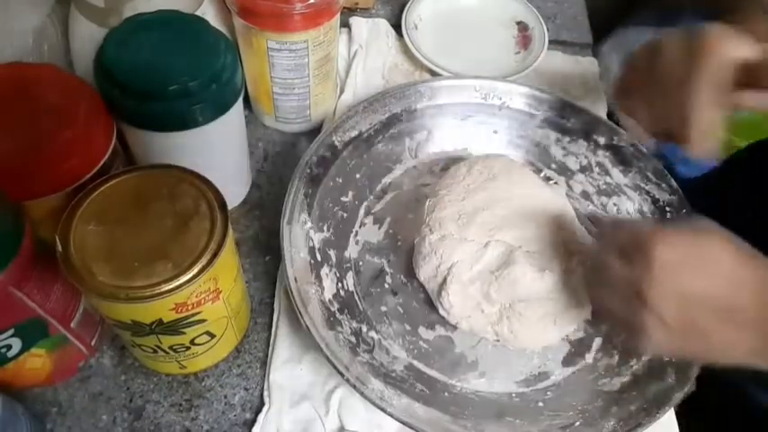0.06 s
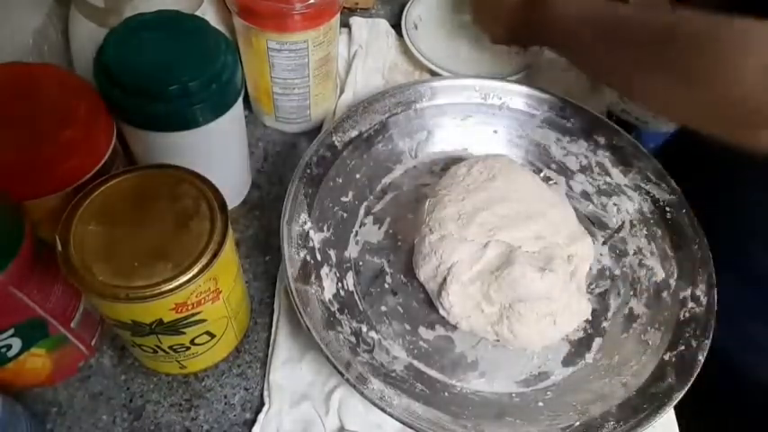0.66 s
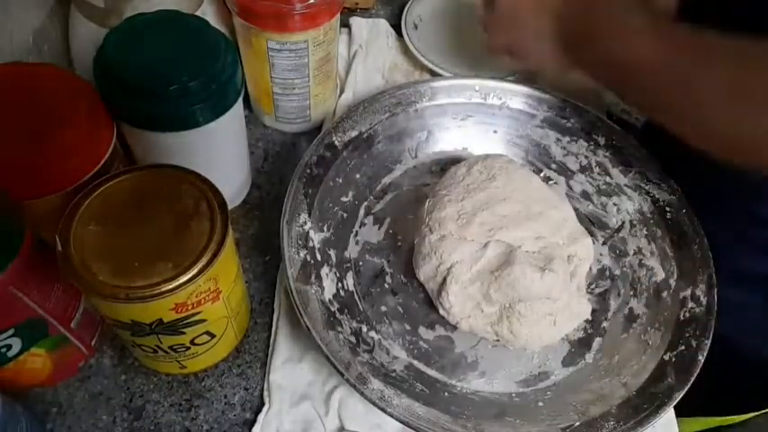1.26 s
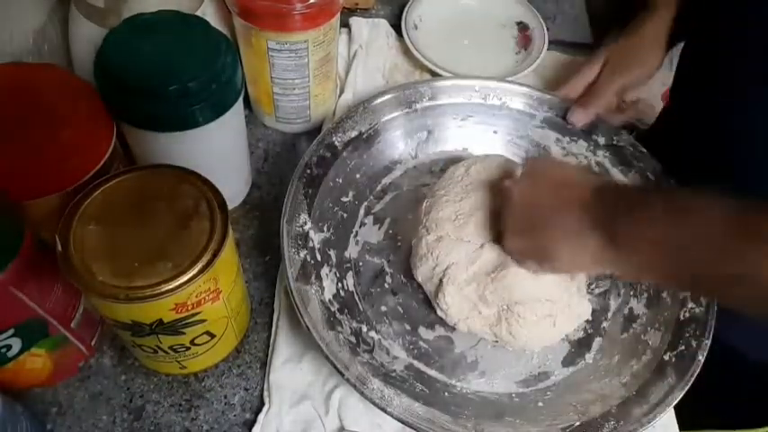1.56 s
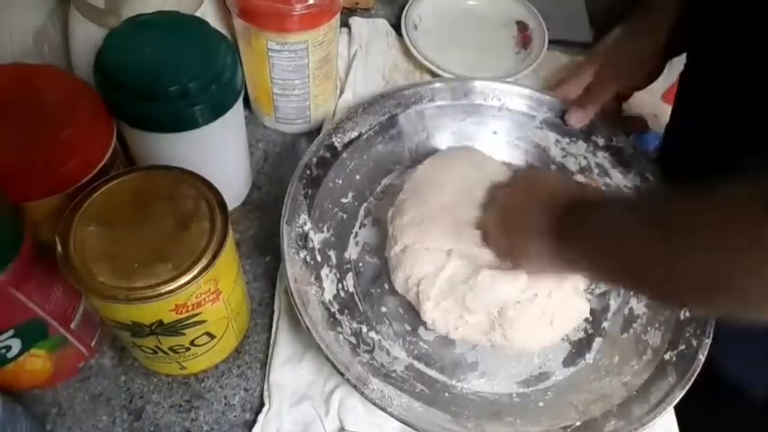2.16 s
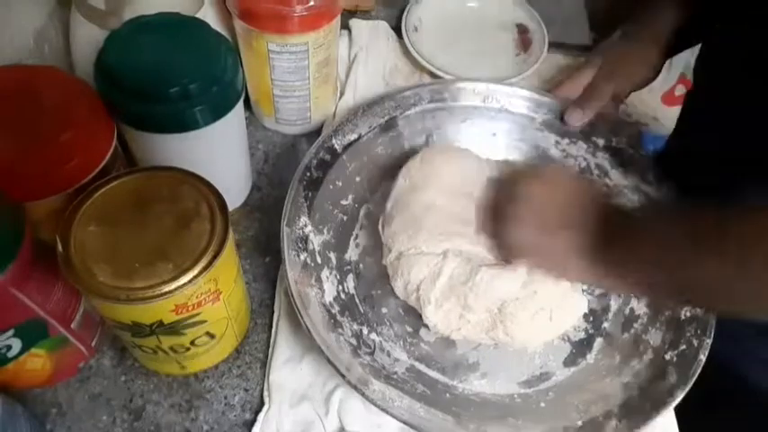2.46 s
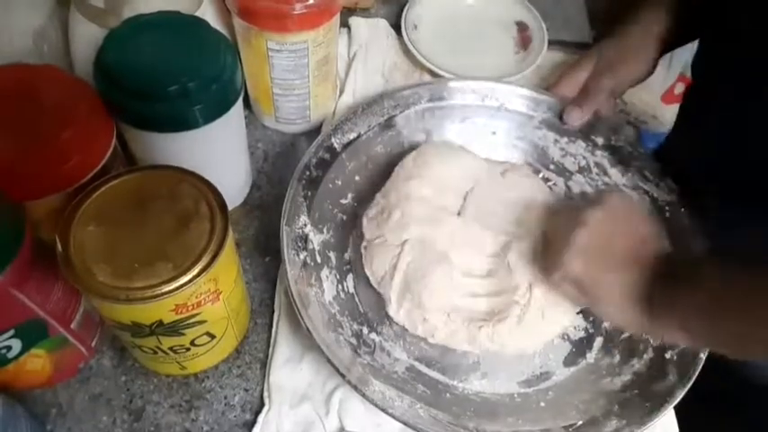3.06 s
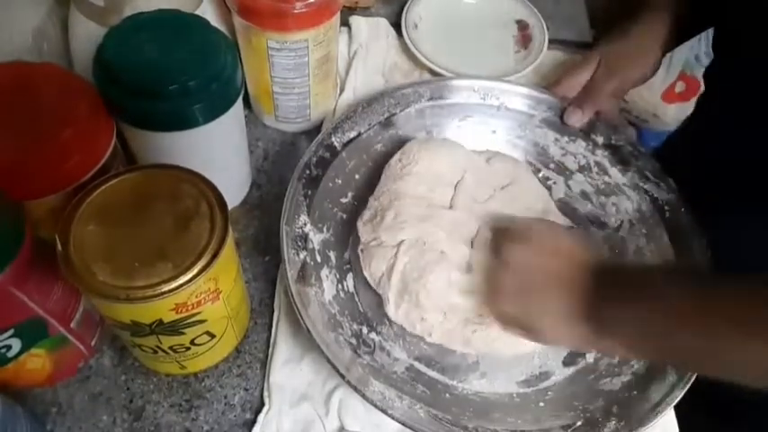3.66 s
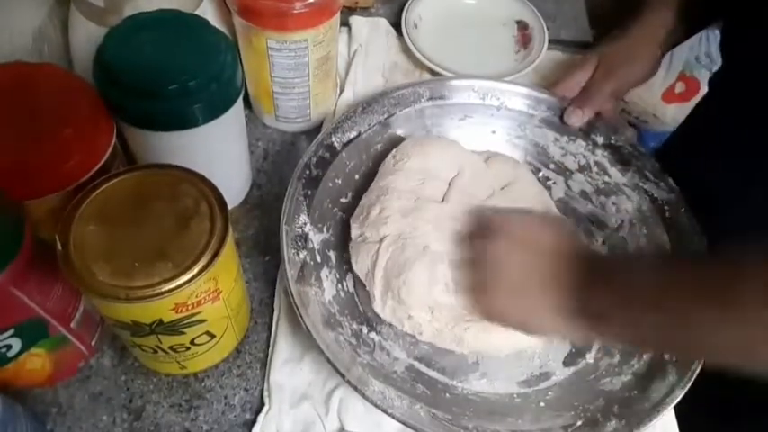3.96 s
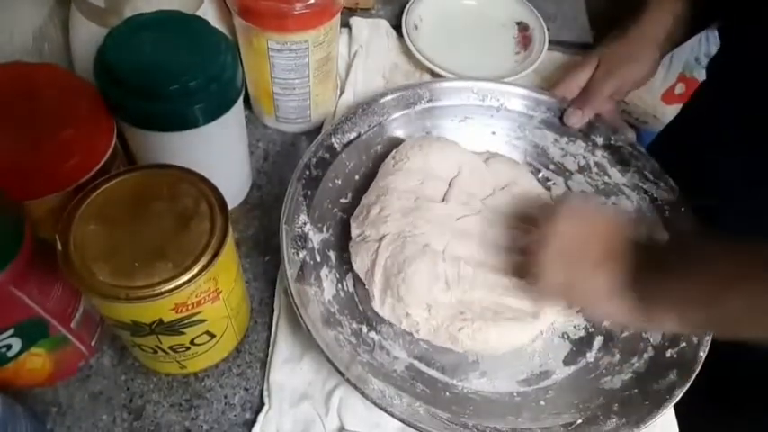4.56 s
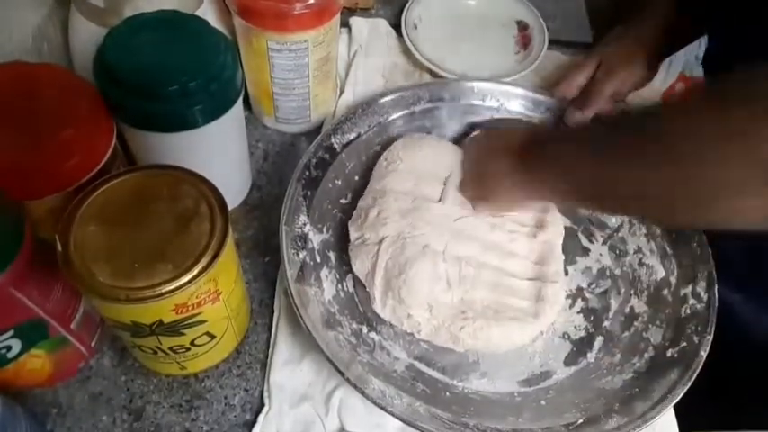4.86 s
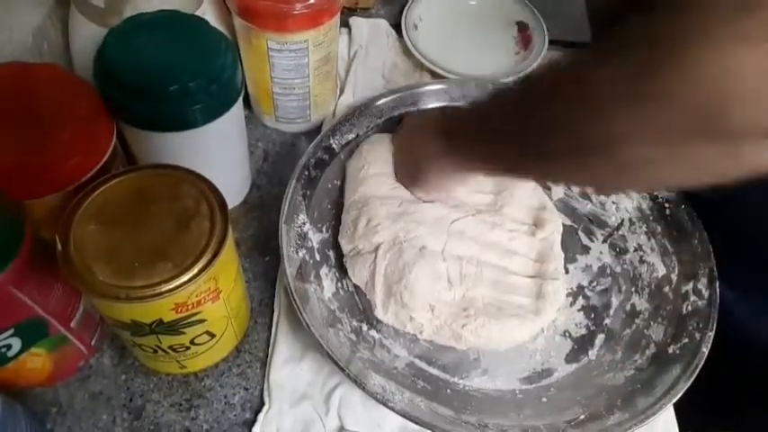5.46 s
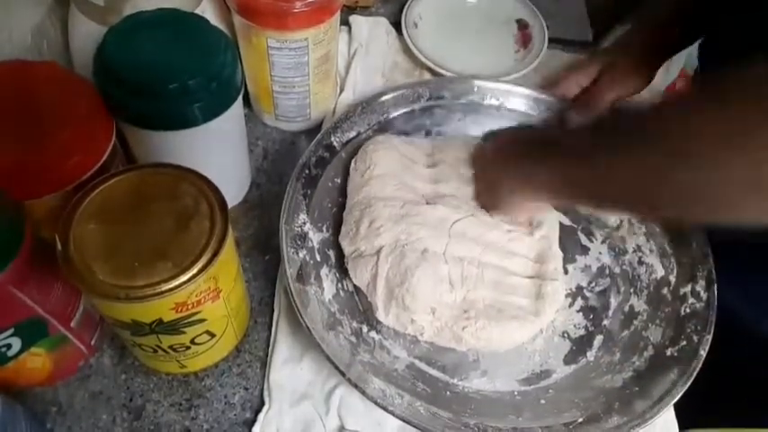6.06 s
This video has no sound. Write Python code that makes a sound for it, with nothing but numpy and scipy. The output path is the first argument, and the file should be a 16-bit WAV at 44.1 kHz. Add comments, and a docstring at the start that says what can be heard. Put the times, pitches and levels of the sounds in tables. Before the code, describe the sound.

A fist kneads dough in a steel tray, with soft thuds, squelches and sticky ticks over a low hum.

```python
"""A low hum of motors fills a small kitchen. Then a hand rubs and folds dough in a floured steel tray:
the flour hisses, tacky skin ticks, the dough pops and sticky spots peel off in short rasps.
A fist pushes in again and again. Each push hisses as skin meets dough, squeezes air out and
thuds the damped tray on the counter. Partway through, the tray rocks and clacks once."""
import sys
import numpy as np
from scipy import signal
from scipy.fft import rfft, irfft, next_fast_len
from scipy.io import wavfile
from scipy.ndimage import uniform_filter1d

SR = 44100
rng = np.random.default_rng(int(sys.argv[2]) if len(sys.argv) > 2 else 0)


def materialize(psi):
    """Save the field psi as 16-bit PCM at rate SR to the path in sys.argv[1].

    A 1-D psi becomes a single channel; in a 2-D psi each row is a channel.
    """
    bounded = np.clip(np.atleast_2d(psi).T, -1, 1)
    quanta = np.round(bounded * 32767).astype(np.int16)
    wavfile.write(sys.argv[1], SR, quanta)


N = 279141
TIME, FFT_SIZE = np.arange(N) / SR, next_fast_len(N, real=True)

# Two kitchen motors. Each row: time in seconds, level of the lower one in dB, of the higher one in dB.
MOTOR_LEVELS = [(0, -54.5, -46.5), (.6, -50, -48.5), (2.1, -46.5, -48), (2.8, -50, -55),
                (4.7, -47.5, -60.5), (5.45, -60.5, -54.5), (6.33, -44.5, -48.5)]
# Tone colours of six noises. Each row: frequency in Hz, relative strength there in dB.
RUMBLE_COLOUR = [(20, -40), (35, -18), (52, 2), (80, -1), (100, 0.5), (122, -4), (150, -6.5), (200, -9.5),
                 (245, -19), (290, -12), (360, -23.5), (500, -30), (800, -35.5), (1400, -41.5),
                 (2200, -40.5), (2900, -45), (6000, -49.5), (8300, -45.5), (10000, -49.5), (15500, -47.5)]  # the room's air
FLOUR_COLOUR = [(700, -12.5), (2200, -5), (6000, -2.5), (16000, 1)]  # floury skin sliding
DRAG_COLOUR = [(150, -20), (450, -6), (900, 4), (1300, -23), (2100, -16.5), (3200, -7), (6000, 5),
               (16000, -62)]  # dough dragging on steel
SKIN_COLOUR = [(500, -11), (1700, -13.5), (4500, -4.5), (9500, -6.5), (13000, -2), (16000, -7.5)]  # the fist meeting dough
SQUELCH_COLOUR = [(120, -14.5), (350, 7), (520, 0), (700, -6), (950, -7.5), (1250, -4), (1600, -4),
                  (2500, 2), (4000, -2.5), (8000, -7.5), (16000, -52)]  # dough being squeezed
PUFF_COLOUR = [(60, -12), (170, -1.5), (270, 0.5), (420, -6.5), (650, -13), (1200, -30), (3000, -67)]  # its soft bulk giving way
# Strokes of the hand. Each row: start, swell time and easing time in seconds, flour hiss in dB,
# dough drag in dB.
HAND_STROKES = [(.832, 0.029, 0.061, -63.5, -77), (1.23, 0.13, 0.077, -63.5, -83),
                (1.548, 0.0028, 0.12, -65.5, -80), (1.659, 0.07, 0.58, -59.5, -73),
                (2.188, .14, 0.21, -53.5, -71), (2.601, 0.015, 0.13, -60, -68),
                (2.739, 0.13, .15, -53.5, -70), (3.19, 0.15, 0.25, -54.5, -68.5),
                (3.695, 0.1, 0.42, -60.5, -74), (4.23, .03, .04, -64, -77),
                (4.299, 0.0045, 0.071, -62.5, -89), (4.367, 0.028, .1, -50.5, -57.5),
                (4.862, 0.057, .04, -64.5, -75), (4.953, 0.051, 0.25, -52, -71),
                (5.384, 0.004, 0.05, -63.5, -87), (5.453, .005, 0.066, -60.5, -67),
                (5.63, 0.0031, 0.2, -59, -81), (6.004, 0.1, 0.087, -58.5, -70),
                (6.115, 0.095, 0.2, -50.5, -63.5)]
# The tray's rim, damped by the holding hand. Each row: pitch in Hz, level in dB, seconds to fade 60 dB.
RIM_TONES = [(494, -3.5, 0.043), (865, -15, 0.047), (1070, -20, 0.23), (1206, -35, 0.27),
             (1634, -4.5, 0.046), (1890, -6, 0.023), (2676, -1.5, 0.082), (3889, -6, 0.147)]
# The kitchen's echo. Each row: frequency in Hz, seconds to fade 60 dB.
ECHO_TIMES = [(100, 0.46), (500, 0.31), (1500, 0.17), (4000, 0.15), (12000, 0.15)]
# Short pops of the dough and sharp, sticky ticks of the hand touching it. Each row: start in seconds,
# level in dB, pitch in Hz, width as a share of the pitch (wider dies sooner), relative crack level in dB.
POPS_AND_TICKS = [(1.2315, -42, 7300, .08, -21), (1.989, -41.5, 11000, 1, 10),
                  (2.0106, -15.5, 1830, 0.19, -8), (2.0165, -21, 2400, .3, -8),
                  (2.041, -20, 3940, 0.13, -4.5), (2.287, -41, 8000, 0.18, -5),
                  (2.393, -39, 9000, 0.47, -3), (2.4935, -23, 4900, .18, -26),
                  (2.496, -13, 10850, 0.14, -4.5), (2.9375, -42.5, 8260, .22, 6.5),
                  (2.959, -38.5, 6000, .31, -15), (3.0245, -19.5, 6000, 0.56, 0.5),
                  (3.495, -21, 4770, .13, 2), (3.999, -44, 11900, 0.15, -25.5),
                  (4.0155, -23, 3880, 0.46, -4.5), (4.184, -40.5, 226, 0.143, -57),
                  (4.9517, -26.5, 8250, .2, -10), (5.0569, -23.5, 3340, 0.72, -27),
                  (5.1432, -28.5, 8150, .72, 2), (5.4525, -36.5, 8640, 0.17, -1),
                  (5.5246, -31.5, 5140, 0.33, -16), (6.112, -23.5, 10900, .16, -3.5)]
# Sticky skin peeling off. Each row: start and fade time in seconds, level in dB, pitch and width in Hz.
SKIN_PEELS = [(1.63, 0.075, -74, 1540, 300), (1.712, .079, -58.5, 6140, 2500),
              (1.718, .05, -69, 2440, 1400), (1.753, 0.036, -61.5, 3120, 1800),
              (1.989, 0.032, -48, 1500, 1303), (2.286, .053, -56.5, 7900, 900),
              (2.326, 0.049, -59, 2110, 1210), (2.388, .04, -56.5, 10100, 7000),
              (4.155, 0.057, -61.5, 1580, 152), (4.16, .055, -55.5, 3380, 1400),
              (4.798, 0.064, -70.5, 2370, 900), (5.045, .025, -47.5, 2580, 700),
              (5.067, 0.051, -49.5, 1930, 200), (5.562, .016, -49, 6120, 4970)]
# Pushes of the fist. Each row: start, swell time and fade time in seconds, skin hiss in dB, squelch
# in dB, pitch of the escaping air in Hz, its level in dB, rasp of the hollow under the fist in dB,
# thud in dB, tilt of the thud in dB per octave (higher is brighter).
FIST_PUSHES = [(1.986, 0.02, 0.045, -36, -38, 1910, -43, -67, -31, 3),
               (2.493, 0.0058, 0.069, -40.5, -39.5, 2070, -42.5, -55, -28, 0.5),
               (2.992, 0.039, .031, -37, -40.5, 1940, -40, -49.5, -38.5, 1),
               (3.482, .018, 0.083, -41, -45, 2270, -41, -54.5, -36, 5.5),
               (4, .017, 0.065, -37.5, -47, 3430, -51.5, -50.5, -40, 2.5),
               (4.15, 0.0097, 0.064, -51, -60.5, 1700, -64, -69, -43, -4),
               (4.525, 0.058, 0.059, -41, -58, 1280, -57, -55.5, -47.5, 3),
               (5.045, 0.026, 0.072, -72, -49, 2070, -53, -62, -41.5, -8),
               (5.131, 0.0415, .073, -37, -42, 1640, -48, -55, -37, -2),
               (5.505, 0.02, 0.1, -51, -64, 1970, -60.5, -69, -62, 0),
               (5.704, 0.061, 0.057, -37.5, -47, 1900, -51.5, -55.5, -37, -0.5),
               (6.153, 0.0078, 0.032, -42.5, -63, 2150, -59, -66, -64, -10),
               (6.286, 0.019, 0.033, -35.5, -42, 2300, -63, -61, -32.5, -9)]
# The loaded tray on its cloth. Each row: pitch in Hz, relative level in dB, seconds to fade 60 dB.
TRAY_TONES = [(61, 9, 0.099), (96, 4.5, 0.32), (122.7, 5.5, 0.24), (186, -2, 0.254), (222, -6.5, 0.44),
              (269.8, -9, 0.043), (287.2, -1.5, 0.2), (333.4, -6.5, 0.03), (375, -8.5, 0.21),
              (468, -10, 0.15), (559, -25.5, 0.47)]
# The two quick hits of the tray's clack on the counter. Each row reads as in POPS_AND_TICKS.
CLACK_HITS = [(4.3814, -16, 1880, 0.24, -6), (4.3848, -22, 1960, 0.41, -12)]


def amp(db):
    """Turns decibels into a number to multiply a sound by."""
    return 10 ** (np.asarray(db) / 20)


def unit(x):
    """Scales a signal so that its average level (rms) is one."""
    return x / np.sqrt(np.mean(x ** 2) + 1e-20)


def look_up(table, hz):
    """Reads a table at any frequency, sliding between its rows on a scale of octaves."""
    row_hz, value = np.transpose(table)
    return np.interp(np.log(hz + 1), np.log(row_hz), value)


def colour(x, table):
    """Gives a noise the tone colour in a table, at a level of one."""
    gain = amp(look_up(table, np.fft.rfftfreq(FFT_SIZE, 1 / SR)))
    return unit(irfft(rfft(x, FFT_SIZE) * gain, FFT_SIZE)[..., :N])


def add(mix, start, sound):
    """Mixes a sound into both channels at a start time in seconds."""
    part = mix[:, max(round(start * SR), 0):][:, :sound.shape[-1]]
    part += sound[..., :part.shape[1]]


def excerpt(noise, start, t):
    """Takes a piece of a long noise, beginning at start and lasting as long as t."""
    return noise[:, (round(start * SR) + np.arange(len(t))) % N]


def drift(per_s):
    """A curve that wanders to a new random value per_s times a second."""
    points = rng.standard_normal(4000)
    return unit(np.interp(TIME * per_s, np.arange(len(points)), points))


def motor_hum():
    """Two motors beat against each other over a weaker mains hum; all three waver slightly."""
    times, lower_db, higher_db = np.transpose(MOTOR_LEVELS)
    lower, higher = np.interp(TIME, times, lower_db), np.interp(TIME, times, higher_db)
    out = np.zeros(N)
    for hz, db in [(58.15, lower), (76.9, higher), (120, -59)]:
        level = np.sqrt(2) * amp(db + 0.2 * drift(2.5))
        out += level * np.sin(2 * np.pi * (hz * TIME + rng.random()) + .02 * drift(13))
    return out


def room_air():
    """A rumble shared by both ears lies under a thin hiss from all around."""
    common, apart = rfft(rng.standard_normal((2, FFT_SIZE)))
    apart_db = [(60, -9), (130, -13.5), (300, -5), (1000, -1), (5000, 1)]  # pairs of Hz and dB
    apart = apart * amp(look_up(apart_db, np.fft.rfftfreq(FFT_SIZE, 1 / SR)))
    return amp(-52.5) * colour(irfft([common + apart, common - apart], FFT_SIZE), RUMBLE_COLOUR)


def friction(per_s, spread_db, smooth, lumpy_db):
    """Rubbing makes countless tiny slips of uneven size, in clumps, over a smooth hiss."""
    hiss = rng.standard_normal(N)
    at = np.flatnonzero(rng.random(N) < per_s / SR)
    slips = np.zeros(N)
    slips[at] = np.sign(hiss[at]) * amp(spread_db * np.minimum(rng.exponential(1, N)[at], 4))
    return (unit(slips) + smooth * hiss) * amp(lumpy_db * drift(220))


def flour_hiss(shared):
    """Fine grains hiss all over the tray; the two ears share only part of the sound."""
    common, left, right = (friction(per_s=1500, spread_db=4.5, smooth=1.1, lumpy_db=3.5)
                           for _ in range(3))
    return colour(np.sqrt(shared) * common + np.sqrt(1 - shared) * np.array([left, right]), FLOUR_COLOUR)


def steel_wall(x, patchy_db, apart=1.0):
    """The hand moves within the tray's curved wall, so the colour at each ear keeps changing."""
    hz, _, spectrum = signal.stft(x, SR, nperseg=256)
    patches = uniform_filter1d(rng.standard_normal((3, *spectrum.shape)), size=3, axis=1)
    level, phase, balance = unit(uniform_filter1d(patches, size=6, axis=2))
    turn = apart * np.minimum(hz / 3500, 1)[:, None] ** 0.5 * phase + np.pi * hz[:, None] / SR * .7
    side = amp(3.6 * balance) * np.exp(-1j * turn)  # what one ear gains, the other loses
    ears = spectrum * amp(patchy_db * level) * np.array([side, 1 / side])
    return unit(signal.istft(ears, SR, nperseg=256)[1][:, :N])


def stroke(t, swell, ease):
    """The loudness of one stroke: the hand grips, speeds up, slows down and lifts off."""
    grip_db = -12.5 * np.clip(1 - t / swell, 0, 1) ** 1.1
    ease_db = -11 * np.maximum(t - swell, 0) / ease
    lift = np.exp(-np.maximum(t - swell - ease, 0) / .015)
    return np.clip(t / 0.0014, 0, 1) * amp(grip_db + ease_db) * lift


def hand_rubs():
    """Floury skin slides over the dough, and the dough drags over the steel."""
    flour = flour_hiss(shared=0.06)
    drag = friction(per_s=270, spread_db=3.5, smooth=2.5, lumpy_db=3.9)
    drag = steel_wall(colour(drag, DRAG_COLOUR), patchy_db=5)
    t, out = np.arange(SR // 2) / SR, np.zeros((2, N))
    for start, swell, ease, flour_db, drag_db in HAND_STROKES:
        rub = amp(flour_db) * excerpt(flour, start, t) + amp(drag_db) * excerpt(drag, start, t)
        add(out, start, rub * stroke(t, swell, ease))
    return out


def snap(hz, width, crack_db):
    """A crack and a very short ring; each spot has its own echoes off the tray wall."""
    t = np.arange(SR // 20) / SR
    crack, wall = rng.standard_normal((2, 2, len(t))) * np.exp(-t / [[[.003]], [[.0025]]])
    cut_lows = signal.butter(2, min(0.96 * hz, 6000), "high", fs=SR, output="sos")
    crack = signal.sosfilt(cut_lows, crack)
    ring = np.sin(2 * np.pi * hz * t) * np.exp(-np.pi * width * hz * t) * (1 - np.exp(-hz * t / 0.33))
    ring /= abs(ring).max()
    echoes = signal.fftconvolve(wall * (t > .0006), ring[None], axes=1)[:, :len(t)]
    echoes += 0.21 * echoes[::-1]  # each ear hears a little of the other side
    return 0.37 * ring + 0.55 * echoes / abs(echoes).max() + 0.49 * amp(crack_db) * crack


def tacky_ticks(per_s=18, hz=8550, touch_db=9.5, slide_db=5, spread_db=7.5):
    """Tacky skin ticks at first touch, then at random as it slides; the levels follow the flour hiss."""
    out = np.zeros((2, N))
    pitches, sizes = rng.standard_normal((len(HAND_STROKES), 8, 2)).transpose(2, 0, 1)
    waits = rng.exponential(1, pitches.shape) / per_s
    for i, (start, swell, ease, flour_db, _) in enumerate(HAND_STROKES):
        first, *later = [snap(hz * np.exp(.15 * p), width=.4, crack_db=-11.5) for p in pitches[i]]
        add(out, start, amp(flour_db + touch_db) * first)
        for at, size, tick in zip(np.cumsum(waits[i]), sizes[i], later):
            level = amp(flour_db + slide_db + spread_db * size) * stroke(at, swell, ease)
            add(out, start + at, level * tick)
    return out


def rim_ring(x):
    """Sounds in the tray set its steel rim ringing briefly."""
    t = np.arange(SR // 5) / SR
    ring = sum(amp(db - 60 * t / fade) * np.cos(2 * np.pi * hz * t) * 2 * np.log(1000) / (fade * SR)
               for hz, db, fade in RIM_TONES)
    return x + signal.fftconvolve(x, ring[None], axes=1)[:, :N]


def kitchen_echo(x, echo_db):
    """Tins and walls send back a short, dense echo, alike at both ears only in the bass."""
    bounces = rng.standard_normal((2, SR // 2)) * (np.arange(SR // 2) > .004 * SR)
    hz, when, ears = signal.stft(bounces, SR, nperseg=256)
    shared = look_up([(150, 0.41), (500, 0.44), (1500, 0.074)], hz)[:, None]
    ears[1] = shared * ears[0] + np.sqrt(1 - shared ** 2) * ears[1]
    fading = amp(-60 * when / look_up(ECHO_TIMES, hz)[:, None])
    tail = signal.istft(ears * fading, SR, nperseg=256)[1]
    return x + amp(echo_db) * signal.fftconvolve(x, tail / np.linalg.norm(tail[0]), axes=1)[:, :N]


def snaps(rows):
    """Plays a table of short, sharp sounds: dough pops and sticky ticks, or the tray's clack."""
    out = np.zeros((2, N))
    for start, db, hz, width, crack_db in rows:
        add(out, start, amp(db) * snap(hz, width, crack_db))
    return out


def pressure(t, swell, fade, touch_db):
    """Contact starts at once, more lightly in a slow push, swells, and is 20 dB down after the fade."""
    swell_db = touch_db * np.sqrt(swell / 0.019) * np.clip(1 - t / swell, 0, 1)
    fade_db = -20 * (np.maximum(t - swell, 0) / fade) ** 1.32
    return np.clip(t / 0.0024, 0, 1) * amp(np.maximum(swell_db + fade_db, -150))


def resonate(x, hz, width_hz):
    """Makes a sound ring around a pitch that follows the curve hz."""
    turn = np.exp(2j * np.pi * np.cumsum(hz) / SR)
    decay = np.exp(-np.pi * width_hz / SR)
    return (turn * signal.lfilter([1 - decay], [1, -decay], x / turn)).real


def rasp(load, hz, width_hz):
    """A run of tiny slips rings the hollow between hand and dough."""
    slips = rng.standard_normal(len(load)) * (rng.random(len(load)) < 2500 / SR)
    pitch = np.full(len(load), hz)
    ring = resonate(resonate(slips, pitch, width_hz), pitch, 2 * width_hz)
    return unit(ring * load) * np.sqrt(np.mean(load ** 2))


def skin_peels():
    """Skin pulls away from the dough with a quick swell and a short fade."""
    t, out = np.arange(SR // 4) / SR, np.zeros((2, N))
    for start, fade, db, hz, width_hz in SKIN_PEELS:
        load = pressure(t, swell=.009, fade=fade, touch_db=-2.5)
        add(out, start, amp(db) * rasp(load, hz, width_hz))
    return out


def escaping_air(t, swell, fade, hz):
    """Air squeezed out of the dough sinks in pitch as the fist goes in."""
    sinking_hz = hz * 2 ** (-11 * np.clip(t - swell, -.008, .045))
    air = resonate(rng.standard_normal((2, len(t))), sinking_hz, width_hz=370)
    air = resonate(air, sinking_hz, width_hz=1050)
    load = pressure(t, swell, fade * 0.64, touch_db=-22)
    return unit((air + 0.34 * air[::-1]) * load) * np.sqrt(np.mean(load ** 2))


def fist_pushes():
    """Skin hisses first; then the dough squelches, air escapes and the hollow under the fist rasps."""
    skin = friction(per_s=2500, spread_db=2.5, smooth=1, lumpy_db=0)
    skin = steel_wall(colour(skin, SKIN_COLOUR), patchy_db=1.5)
    squelch = friction(per_s=970, spread_db=2.5, smooth=0.8, lumpy_db=2)
    squelch = steel_wall(colour(squelch, SQUELCH_COLOUR), patchy_db=4.5)
    t, out = np.arange(SR // 3) / SR, np.zeros((2, N))
    for start, swell, fade, skin_db, squelch_db, air_hz, air_db, hollow_db, _, _ in FIST_PUSHES:
        touch = pressure(t, swell, fade, touch_db=-7.5)
        squeeze = pressure(t - .003, swell, fade * 1.17, touch_db=-15)
        press = pressure(t - .008, swell, fade, touch_db=-15.5)
        add(out, start, amp(skin_db) * excerpt(skin, start, t) * touch)
        add(out, start, amp(squelch_db) * excerpt(squelch, start, t) * squeeze)
        add(out, start, amp(air_db) * escaping_air(t, swell, fade, air_hz))
        add(out, start, amp(hollow_db) * rasp(press, hz=926, width_hz=310))
    return out


def thud(level_db, tilt_db, build_s):
    """The dough passes the weight on slowly, so only the low, damped tones of the tray answer."""
    t = np.arange(SR // 2) / SR
    hz, db, fade = np.transpose(TRAY_TONES)[:, :, None]
    size = amp(db + tilt_db * np.log2(hz / 200))
    # Higher tones reach the two ears more out of step.
    phase = rng.random(hz.shape) + hz / 3500 * rng.standard_normal((2, *hz.shape))
    loaded_hz = hz * (1 + .02 * rng.standard_normal(hz.shape))  # the dough lies differently each time
    ring = np.sin(2 * np.pi * (loaded_hz * t + phase)) * amp(-60 * np.maximum(t - build_s, 0) / fade)
    load = np.sin(np.pi / 2 * np.clip(t / build_s, 0, 1)) ** 2
    return amp(level_db) * load * (size * ring).sum(1) / np.linalg.norm(size)


def tray_thuds():
    """The dough gives way with a dull puff and the tray takes the weight; it also settles after rocking."""
    bulk = steel_wall(colour(rng.standard_normal(N), PUFF_COLOUR), patchy_db=3.5, apart=0.68)
    t, out = np.arange(SR // 3) / SR, np.zeros((2, N))
    puff = pressure(t, swell=0.013, fade=0.043, touch_db=-4)
    for start, swell, *_, level_db, tilt_db in FIST_PUSHES:
        loaded = start + 0.00897 + .5 * swell  # a slow push reaches the tray later
        add(out, loaded, thud(level_db, tilt_db, build_s=0.024))
        add(out, loaded, amp(level_db - 18) * excerpt(bulk, start, t) * puff)
    add(out, CLACK_HITS[-1][0], thud(level_db=-40.5, tilt_db=3.5, build_s=0.0079))
    return out


def scene():
    """The tray stands close by, a little louder on the left; its clack echoes less than the dough."""
    dough = fist_pushes() + hand_rubs() + tacky_ticks() + skin_peels() + snaps(POPS_AND_TICKS)
    dough = kitchen_echo(rim_ring(dough), echo_db=-5.5)
    clack = kitchen_echo(snaps(CLACK_HITS), echo_db=-7.5)
    left_right = amp([[1], [-1]])
    return (dough + clack + tray_thuds()) * left_right + motor_hum() + room_air()


def record(dry):
    """Cuts away the very highest treble, above 15900 Hz."""
    cut_highs = signal.firwin(401, 15900, window=("kaiser", 8), fs=SR)
    return signal.oaconvolve(dry, cut_highs[None], "same")


dry = scene()
out = record(dry)
materialize(out)
```